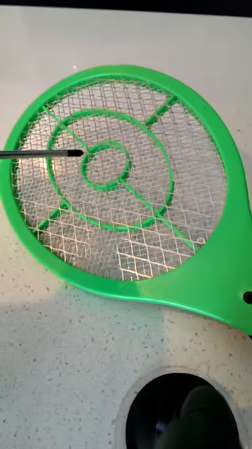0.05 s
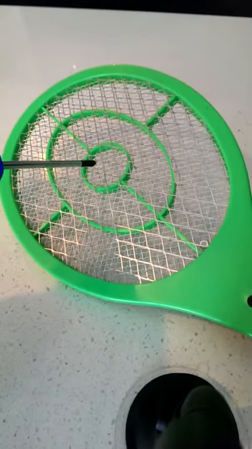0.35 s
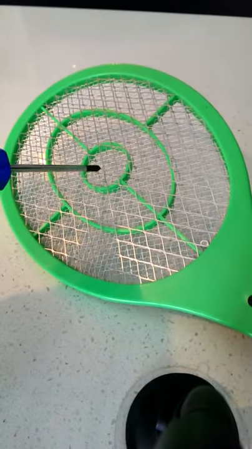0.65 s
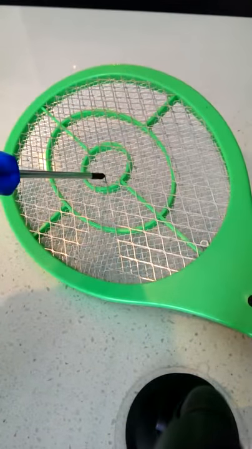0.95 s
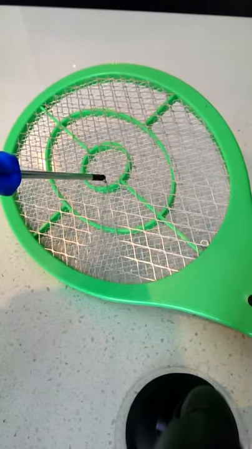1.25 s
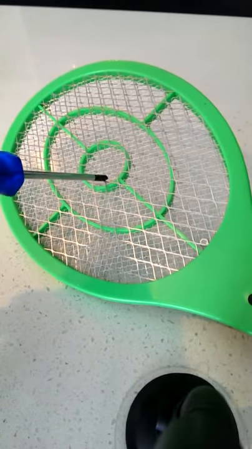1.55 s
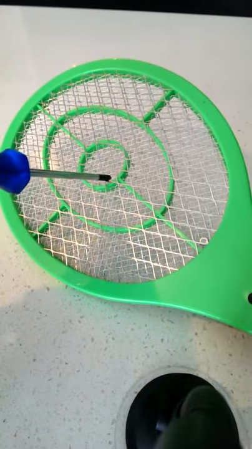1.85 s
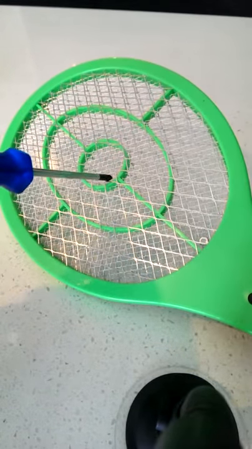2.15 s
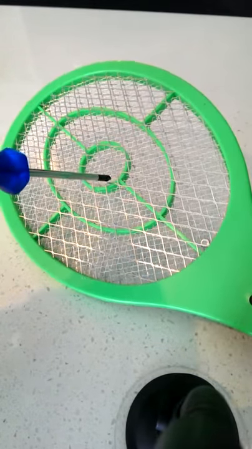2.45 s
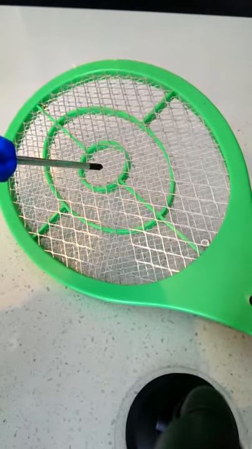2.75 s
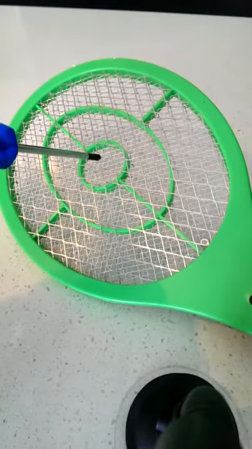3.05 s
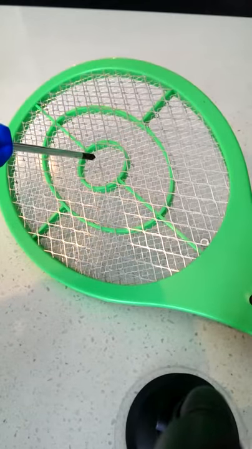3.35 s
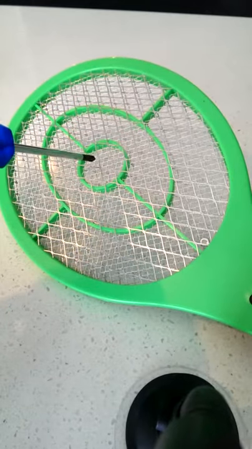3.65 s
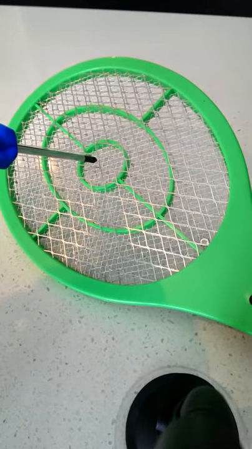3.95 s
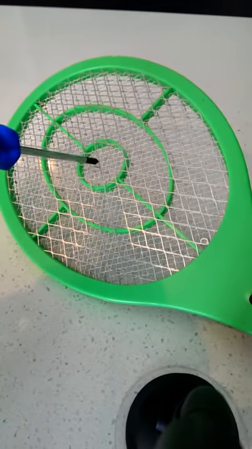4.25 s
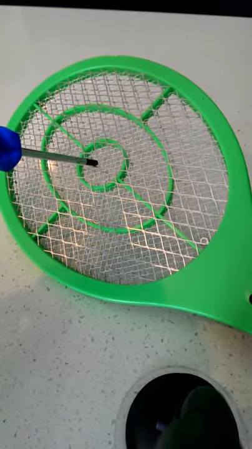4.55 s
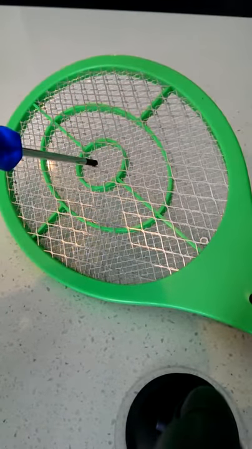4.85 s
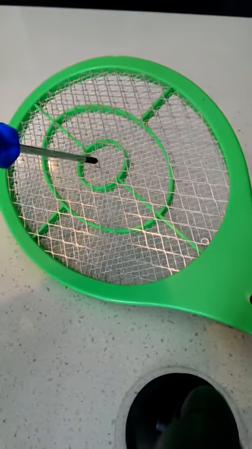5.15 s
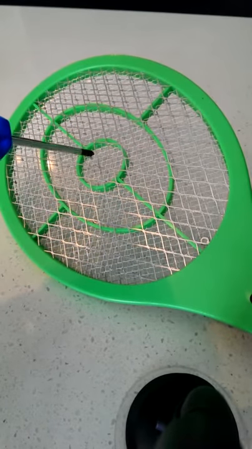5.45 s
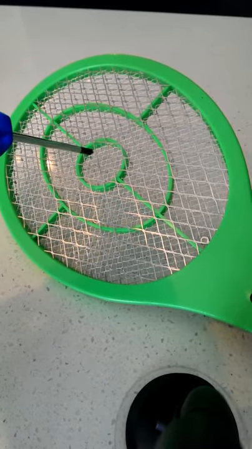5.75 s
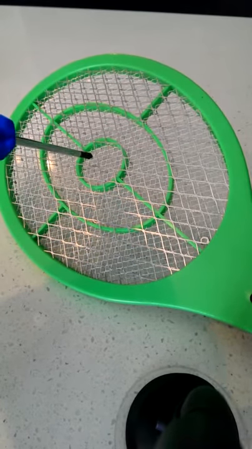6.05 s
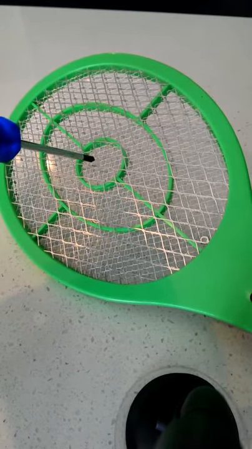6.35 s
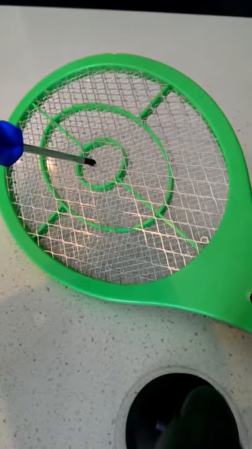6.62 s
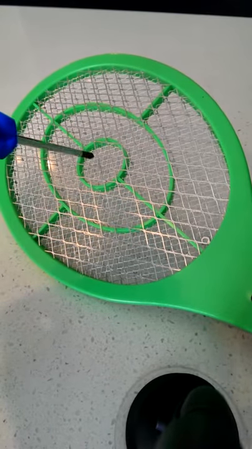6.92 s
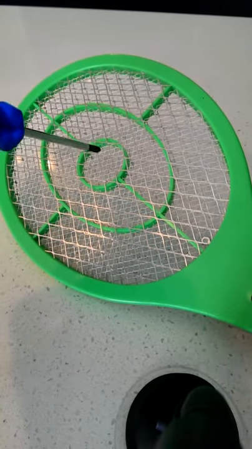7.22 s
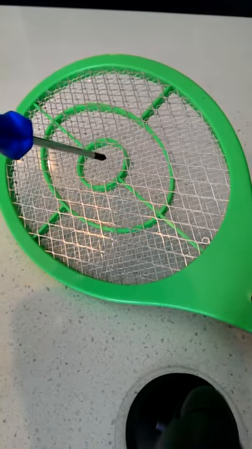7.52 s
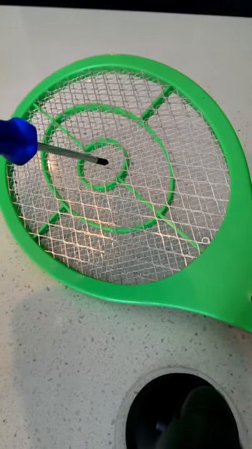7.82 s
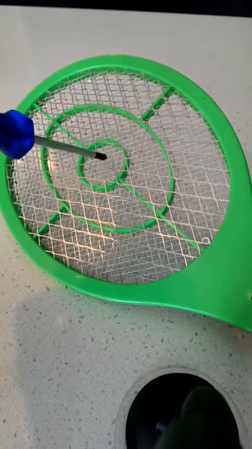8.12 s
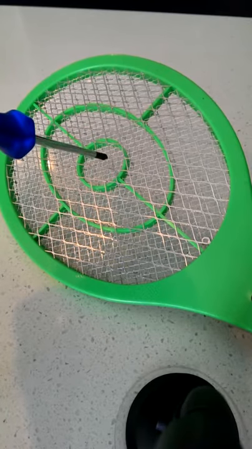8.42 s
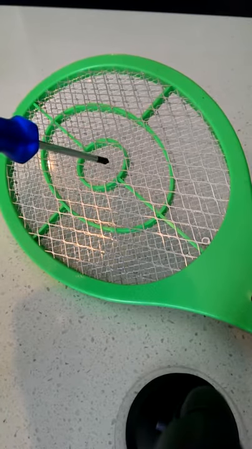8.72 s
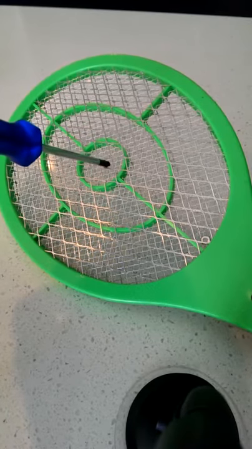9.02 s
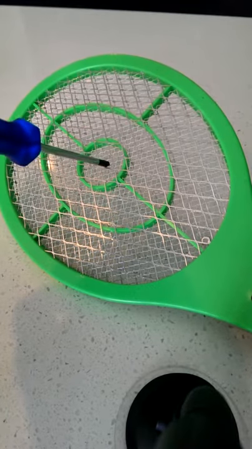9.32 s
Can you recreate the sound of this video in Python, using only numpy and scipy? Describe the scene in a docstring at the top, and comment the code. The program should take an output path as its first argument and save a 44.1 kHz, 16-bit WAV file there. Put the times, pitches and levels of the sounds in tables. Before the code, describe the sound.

An electric fly swatter gives four loud, sharp spark cracks in a small echoing room, with light screwdriver scratches and taps on its mesh.

```python
"""An electric fly swatter sparks loudly four times as a screwdriver tip is worked into its charged mesh.
Each time its capacitors empty through an arc: the crack overloads the microphone, which thumps as it
recovers, and a small, hard-walled workshop echoes. In between, the tip scratches, taps and rubs the
wires, jolting against them after some arcs, and one tiny spark ticks. Faint rumble and hiss lie below."""
import sys
import numpy as np
from scipy import signal
from scipy.fft import rfft, irfft
from scipy.io import wavfile
from scipy.ndimage import uniform_filter1d

SR = 44100
rng = np.random.default_rng(int(sys.argv[2]) if len(sys.argv) > 2 else 0)


def unload_audio(sound):
    """Save the sound as a 16-bit wav file, at the path given as the first command line argument."""
    columns = np.transpose(np.atleast_2d(sound))
    # keep every value between -1 and 1, then stretch to whole-number steps
    steps = np.round(np.clip(columns, -1, 1) * 32767)
    wavfile.write(sys.argv[1], SR, steps.astype(np.int16))


N = 413658
TIME = np.arange(N) / SR

# The tone of the background. Each row: frequency in Hz, left and right level in dB per Hz.
BACKGROUND_TONE = [(25.2, -105.5, -100.9), (47, -90, -91.5), (62.2, -79.0, -80), (147, -88.5, -86.5),
                   (310, -88.5, -90), (473, -93.5, -92), (935, -96, -92.5), (1710, -96.5, -96.5),
                   (3130, -92.5, -91), (4460, -102.9, -97.0), (5700, -109.2, -113.6),
                   (7600, -110.8, -120.3), (12900, -112.8, -126.8), (14300, -126.6, -135.8)]
# How alike the two sides of the background are. Each row: frequency in Hz, likeness from -1 to 1.
LIKENESS = [(60, 0.94), (290, 0.88), (640, 0.42), (1400, -0.24), (3000, 0.034)]
# The tip strikes the mesh. Each row: start in seconds, strength in dB.
TOUCHES = [(1.018, -16.5), (1.315, -22.5), (1.589, -16.5), (2.476, 5.5), (4.382, -21), (4.485, -23),
           (4.89, -16), (5.2, 3), (6.857, 0)]
# The notes of the mesh in its frame. Each row: pitch in Hz, level in dB, seconds to fade by 60 dB.
MESH_NOTES = [(572, -6, 0.15), (630, -12.5, 0.2), (820, -10, 0.027), (993, -16, 0.22), (1082, -8.5, 0.099),
              (1280, -8.5, 0.029), (1450, -13, 0.22), (1780, -23, .2), (2070, -5, 0.059), (2235, -8.5, 0.1),
              (2800, -18, 0.088), (3620, -28, 0.14), (4130, -30, 0.17), (4200, -12, 0.05),
              (4750, -12, 0.13)]
# The tone of rattles and ticks. Each row: frequency in Hz, left and right level in dB per Hz.
RATTLE_TONE = [(300, -86, -76.5), (810, -82, -64.5), (1500, -70, -65.5), (2270, -66, -77),
               (3120, -66, -60.5), (4580, -75, -60.5), (5060, -75, -74.5), (6030, -78, -91),
               (9350, -99, -100), (14800, -90, -116)]
# How long the room rings. Each row: frequency in Hz, seconds to fade by 60 dB.
ROOM_FADE = [(200, 0.48), (1000, 0.52), (3500, 0.44), (8000, 0.33), (15000, 0.22)]
# Light taps on frame or wire. Each row: start in seconds, level in dB, pitch in Hz.
KNOCKS = [(1.021, -37, 4500), (4.400, -43, 1170), (4.649, -43, 1310), (6.641, -42.5, 1330)]
# The tip is drawn along a wire. Each row: start and length in seconds, pressure in dB.
RUBS = [(1.609, 0.11, -2), (1.763, .175, -11), (2.03, .13, -19), (4.387, 0.16, -11), (4.647, 0.063, -12),
        (4.758, 0.053, -8), (4.866, 0.13, -11)]
# The arcs. Each row: start in seconds, crack level in dB, sizzle fade time in seconds,
# room, bark and thump levels in dB, length of the thump's dip in seconds.
SPARKS = [(2.2040, -2, 0.0023, -2, -12, -16.5, 0.0027), (5.0249, -2.5, 0.0029, -5.5, -20, -11, 0.0028),
          (6.729, -6, 0.0014, -9.5, -21, -6, 0.00064), (9.264, 3.5, 0.0022, 0, -5.5, -8, 0.0024)]
# The tone of a crack. Each row: frequency in Hz, left and right level in dB per Hz.
CRACK_TONE = [(95, -64, -52.5), (513, -56, -66), (1070, -63.5, -51), (1850, -65, -52), (2500, -54, -61.5),
              (3070, -49.5, -59), (3900, -65.5, -49.5), (6200, -63.5, -72.5), (9700, -64, -80),
              (12900, -74, -102), (14200, -56.5, -77)]
# The tone of its echo. Each row: frequency in Hz, left and right level in dB per Hz.
ECHO_TONE = [(100, -94, -127), (197, -97, -75), (370, -72.5, -80), (624, -75, -77.5), (1080, -71, -68.5),
             (1610, -70.5, -71.5), (2640, -63, -63), (3770, -61, -56), (5080, -67.5, -60.5),
             (6740, -73, -87.5), (9400, -76.5, -83), (11600, -79, -102), (14200, -72.5, -100)]
# The dry tick of a tiny spark. Each row: start in seconds, level in dB.
TINY_SPARKS = [(2.62, -1)]


def from_db(db):
    """Turn decibels into a number to multiply by."""
    return 10 ** (np.asarray(db) / 20)


def at_hz(table, hz, column=1):
    """Read between the rows of a table, with every octave equally wide."""
    table = np.array(table)
    return np.interp(np.log(np.maximum(hz, 1)), np.log(table[:, 0]), table[:, column])


def butter(x, hz, kind, order=2):
    """Keep the low part, the high part or a band of a sound."""
    return signal.sosfilt(signal.butter(order, hz, kind, fs=SR, output="sos"), x + 1e-18)


def colour(x, table, size=4096):
    """Filter a sound so that white noise would take on the table's left and right tone."""
    hz = np.arange(size // 2 + 1) * SR / size
    gain = from_db([at_hz(table, hz, column=1), at_hz(table, hz, column=2)]) * np.sqrt(SR / 2)
    # Folding the cepstrum makes the filter answer promptly, and never ahead of the sound.
    cepstrum = irfft(np.log(gain))
    cepstrum[:, 1:size // 2] *= 2
    cepstrum[:, size // 2 + 1:] = 0
    response = irfft(np.exp(rfft(cepstrum)))
    return signal.fftconvolve(x * np.ones((2, 1)), response, axes=1)[:, :N]


def add(out, start_s, sound):
    """Mix a sound in at its start time."""
    start = round(start_s * SR)
    out[..., start:start + sound.shape[-1]] += sound[..., :N - start]


def pan(sound, left_db):
    """Put a sound on both sides, turning the left one down."""
    return sound * from_db([[left_db], [0]])


def ring(force, hz, fade_s):
    """A force sets one note ringing; left alone, it fades by 60 dB in fade_s."""
    keep, angle = from_db(-60 / (fade_s * SR)), 2 * np.pi * hz / SR
    drive = np.sqrt((1 - keep ** 2) / 2) * np.array([1, 0, -1])
    return signal.lfilter(drive, [1, -2 * keep * np.cos(angle), keep ** 2], force + 1e-18)


def background():
    """The room rumbles, alike on both sides, under the hiss of the microphone."""
    mid, side = rfft(rng.standard_normal((2, N)))
    alike = at_hz(LIKENESS, np.arange(len(mid)) * SR / N)
    pair = np.sqrt((1 + alike) / 2) * mid + np.sqrt((1 - alike) / 2) * side * [[1], [-1]]
    return colour(irfft(pair, N), BACKGROUND_TONE)


def tip_forces(pressure, rise_s=0.0018, hard_decay_s=0.019, doubling_db=49, size=12000):
    """The tip scratches and pushes the wires: lightly while rubbing, in a flurry at each touch."""
    t, friction = TIME[:size], pressure ** 0.48
    scratch, push = from_db(-35.5) * friction, from_db(-22) * friction
    for start_s, strength_db in TOUCHES:
        decay_s = hard_decay_s * 2 ** (-strength_db / doubling_db)  # a gentle touch lingers
        flurry = (1 - np.exp(-t / rise_s)) * np.exp(-t / decay_s)
        add(scratch, start_s, from_db(strength_db) * flurry)
        add(push, start_s, from_db(2 + 0.8 * strength_db) * flurry)  # and is duller: mostly push
    return scratch, push


def mesh(scratch, push, grain_db=3, split_hz=1600, echo_db=-12):
    """The tip skids in many tiny contacts; its push rings the low notes, its scratch the high ones."""
    contacts = rng.standard_normal((2, N)) * from_db(grain_db * np.minimum(rng.exponential(1, N), 5))
    contacts /= contacts.std()
    soft = from_db(-35) * push * contacts[1]
    hard = from_db(-38) * scratch * contacts[1]
    notes = sum(from_db(db) * ring(soft if hz < split_hz else hard, hz, fade_s)
                for hz, db, fade_s in MESH_NOTES)
    notes = butter(notes, [450, 5200], "band", order=4)  # an open mesh gives off no bass
    dull = signal.sosfilt(signal.cheby1(6, 0.5, 5200, fs=SR, output="sos"), contacts)
    treble = butter(contacts, 7600, "high", order=4) * np.minimum(scratch, 1)  # needs a hard jolt
    direct = colour((dull + treble) * scratch, RATTLE_TONE) + pan(notes, left_db=-10)
    room = reflections(swell_s=0.0084)
    room /= np.sqrt(np.sum(room ** 2, axis=1, keepdims=True))
    return direct + from_db(echo_db) * signal.fftconvolve(direct, room, axes=1)[:, :N]


def reflections(swell_s, size=35000):
    """Echoes off the walls pile up for a moment, then die away, the treble first."""
    t, out = TIME[:size], 0
    edges_hz = np.geomspace(60, 19000, 11)
    for low, high in zip(edges_hz, edges_hz[1:]):
        band = butter(rng.standard_normal((2, size)), [low, high], "band")
        fade_s = at_hz(ROOM_FADE, np.sqrt(low * high))
        out = out + band * from_db(-60 * t / fade_s)
    return out * (1 - np.exp(-(t / swell_s) ** 2))


def knocks(contact_s=0.0059, fade_cycles=40, top_hz=5000, size=2500):
    """A soft, uneven tap sets off one quickly fading note of the frame or a wire."""
    out = np.zeros(N)
    for start_s, level_db, hz in KNOCKS:
        force = rng.standard_normal(size) * np.exp(-TIME[:size] / contact_s)
        note = ring(force, hz, fade_cycles / hz)
        add(out, start_s, from_db(level_db) * note / np.abs(note).max())
    return pan(butter(out, top_hz, "low", order=6), left_db=-7)


def tip_pressure(build_s=0.021, release_s=0.024, tremble_db=0.5, trembles_per_s=27):
    """Each rubbing stroke builds, holds and lets go, in a slightly unsteady hand."""
    pressure = np.zeros(N)
    for start_s, length_s, level_db in RUBS:
        build = np.clip((TIME - start_s) / build_s, 0, 1)
        release = np.exp(-np.maximum(TIME - start_s - length_s, 0) / release_s)
        pressure += from_db(level_db) * build * release
    tremble = np.interp(TIME * trembles_per_s, np.arange(1000), rng.standard_normal(1000))
    return pressure * from_db(tremble_db * tremble)


def rubbing(pressure, level_db=-49.5, second_db=-3, fade_s=0.12):
    """Friction keeps the two lowest notes of the mesh singing, as loud as the tip presses."""
    grip = rng.standard_normal((2, N))
    lowest = ring(grip[0], MESH_NOTES[0][0], fade_s)
    second = from_db(second_db) * ring(grip[1], MESH_NOTES[1][0], fade_s)
    hum = butter(lowest + second, [500, 720], "band")
    hum /= np.sqrt(uniform_filter1d(hum ** 2, size=1500))  # sticking and slipping hold it steady
    return pan(from_db(level_db) * pressure * hum, left_db=-10)


def cracks(shock_db=24, sizzle_db=3, left_lag_s=0.0001, bark_hz=850, bark_s=0.00073, size=2000):
    """Each arc makes one shock wave, a brief sizzle and a bark: a note that dies almost at once."""
    t, out, barks = TIME[:size], np.zeros((2, N)), np.zeros(N)
    bark = np.cos(2 * np.pi * bark_hz * t) * np.exp(-t / bark_s)
    for start_s, crack_db, sizzle_s, _, bark_db, *_ in SPARKS:
        burst = from_db(sizzle_db) * rng.standard_normal((2, size)) * np.exp(-t / sizzle_s)
        burst[:, 0] += from_db(shock_db)
        add(out[0], start_s + left_lag_s, from_db(crack_db) * burst[0])
        add(out[1], start_s, from_db(crack_db) * burst[1])
        add(barks, start_s, from_db(bark_db) * bark)
    return colour(out, CRACK_TONE) + pan(barks, left_db=-12)


def thump(delay_s=0.00012, rebound_s=0.00544, rebound_share=0.53, left_db=-12, size=900):
    """A short low thump as the overloaded microphone recovers from each crack, thinner on the left."""
    t, out = TIME[:size] - delay_s, np.zeros(N)
    for start_s, *_, level_db, length_s in SPARKS:
        dip = np.sin(np.pi * np.clip(t / length_s, 0, 1))
        rebound = np.sin(np.pi * np.clip((t - length_s) / rebound_s, 0, 1))
        rebound *= rebound_share * length_s / rebound_s
        add(out, start_s, from_db(level_db) * (rebound - dip))
    right = butter(out, hz=22, kind="high", order=1)
    left = from_db(left_db) * butter(right, hz=70, kind="high", order=1)
    return np.array([left, right])


def workshop(tail_db=8, early_db=-4, early_s=0.05, slap_db=7, slap_width_s=0.00079):
    """The room answers each arc: a slap off a near surface, early echoes and a swelling tail."""
    tail = from_db(tail_db) * reflections(swell_s=0.032)
    t = TIME[:tail.shape[1]]
    early = from_db(early_db) * np.exp(-t / early_s) * rng.standard_normal(tail.shape)
    slap_delay_s = [[0.0078], [0.009]]  # left, right
    slap_shape = np.exp(-((t - slap_delay_s) / slap_width_s) ** 2)
    slap = from_db(slap_db) * slap_shape * rng.standard_normal(tail.shape)
    echo = butter(slap, 6500, "low", order=1) + early + tail
    out = np.zeros((2, N))
    for start_s, _, _, room_db, *_ in SPARKS:
        add(out, start_s, from_db(room_db) * echo)  # same spot, so the same echo
    return colour(out, ECHO_TONE)


def tiny_spark(decay_s=0.001, top_hz=5500, thud_db=-42, thud_hz=380, thud_s=0.0037, size=800):
    """A tiny spark gives one short dry tick, with a small thud."""
    t, ticks, thuds = TIME[:size], np.zeros((2, N)), np.zeros(N)
    thud = np.sin(2 * np.pi * thud_hz * t) * np.exp(-t / thud_s)
    for start_s, level_db in TINY_SPARKS:
        add(ticks, start_s, from_db(level_db) * rng.standard_normal((2, size)) * np.exp(-t / decay_s))
        add(thuds, start_s, from_db(level_db + thud_db) * thud)
    return colour(butter(ticks, top_hz, "low", order=6), RATTLE_TONE) + pan(thuds, left_db=-10)


def scene():
    """Add up the tip on the mesh, the sparks, their echo and the background."""
    pressure = tip_pressure()
    scratch, push = tip_forces(pressure)
    handling = mesh(scratch, push) + rubbing(pressure) + knocks()
    return handling + tiny_spark() + cracks() + thump() + workshop() + background()


def record(dry, overload=0.36, ceiling=0.72, hold_s=0.118, recover_s=0.033, bass_hz=205, top_hz=16000):
    """The bass dips briefly after each overload, peaks are squashed and the highest treble is cut."""
    overloaded = np.abs(dry).max(axis=0) > overload
    since_s = TIME - np.maximum.accumulate(np.where(overloaded, TIME, -1))
    falling = from_db(-500 * np.maximum(since_s - 0.008, 0))  # 500 dB a second, after a short wait
    recovering = np.clip((since_s - hold_s) / recover_s, 0, 1)
    upper = butter(dry, bass_hz, "high", order=6)
    bass = np.maximum(falling, recovering) * (dry - upper)
    squashed = ceiling * np.tanh((upper + bass) / ceiling)
    return signal.sosfilt(signal.ellip(10, 0.1, 80, top_hz, fs=SR, output="sos"), squashed)


dry = scene()
out = record(dry)
unload_audio(out)
```